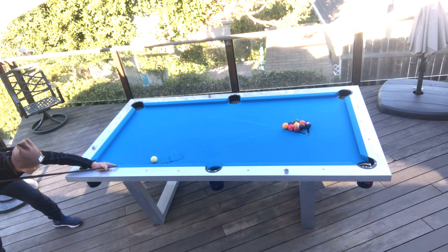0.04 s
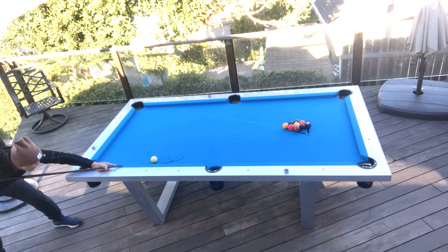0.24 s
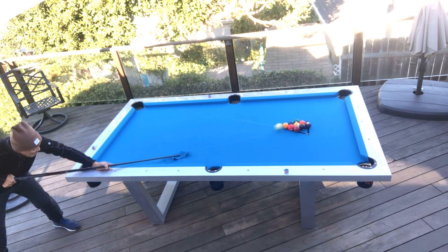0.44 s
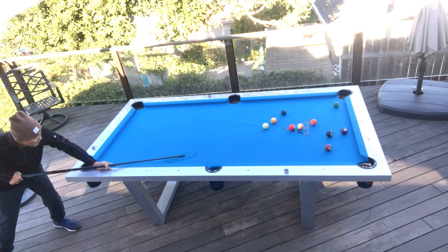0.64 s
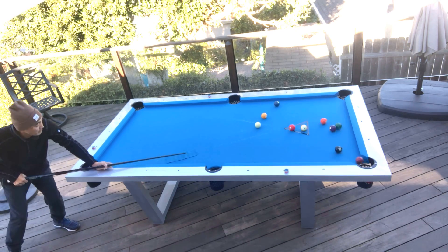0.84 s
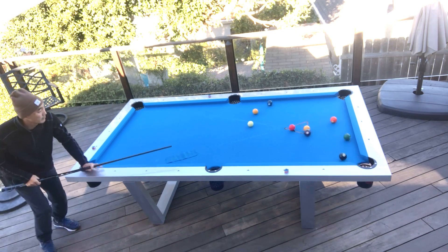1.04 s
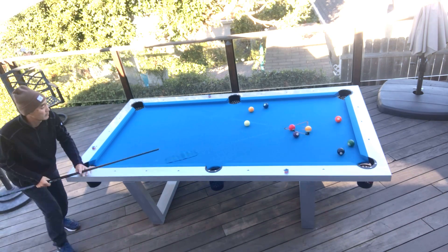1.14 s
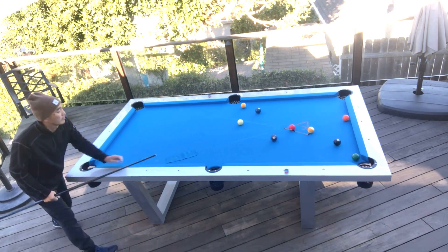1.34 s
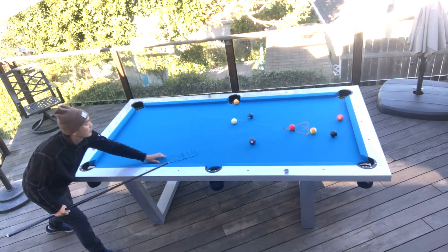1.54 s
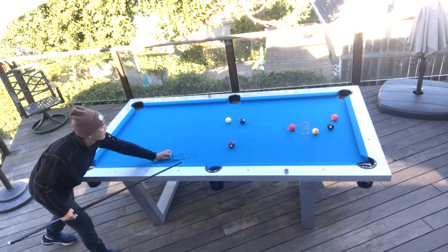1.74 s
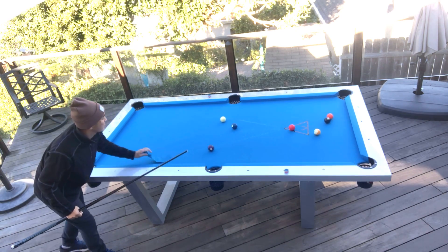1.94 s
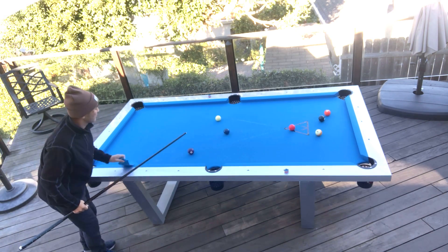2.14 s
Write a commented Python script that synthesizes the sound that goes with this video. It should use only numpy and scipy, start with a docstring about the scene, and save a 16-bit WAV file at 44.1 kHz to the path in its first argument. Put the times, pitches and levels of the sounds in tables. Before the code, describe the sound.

Pool balls burst apart with a loud crack, scattering, clacking and rolling across an outdoor table.

```python
"""A pool break outdoors

The cue cracks against the cue ball, which hops on the slate and bursts the rack. Hard impacts between
balls radiate short pulses; softer ones on cushions and pockets excite the damped modes of the table.
Deck and house walls reflect each impact, over rolling balls, the player's movements and a faint rumble."""
import sys
import numpy as np
from scipy import signal
from scipy.fft import rfft, irfft
from scipy.io import wavfile
from scipy.ndimage import map_coordinates

SR = 44100
rng = np.random.default_rng(int(sys.argv[2]) if len(sys.argv) > 2 else 0)


def log_audio(samples):
    """Write samples as a 16-bit WAV file to the path given in sys.argv[1]."""
    # one column per channel
    frames = np.atleast_2d(samples).T
    # limit to full scale, then quantise
    limited = np.clip(frames, -1, 1)
    pcm = np.round(limited * 32767).astype(np.int16)
    wavfile.write(sys.argv[1], SR, pcm)


N = 97020
T = np.arange(N) / SR
HZ = np.fft.rfftfreq(2 * N, 1 / SR)

# spectrum of a collision between two balls: f/Hz, level/dB
COLLISION_SPECTRUM = [(60, -31.5), (250, -18.5), (650, -23.5), (900, -7), (1150, 1), (1700, 3.5), (2400, 0),
                      (3200, -5), (3900, -18), (5500, -33), (7500, -49.5), (15000, -65.5)]


def amp(db):
    """Amplitude ratio of a level in decibels."""
    return 10 ** (np.asarray(db) / 20)


def unit(x):
    """Normalisation to unit energy."""
    return x / np.sqrt(np.sum(x ** 2) + 1e-20)


def along(points, hz):
    """Interpolation of (f/Hz, value) points on a logarithmic frequency axis."""
    f, values = np.transpose(points)
    return np.interp(np.log(hz + 1), np.log(f + 1), values)


def envelope(points):
    """Amplitude envelope through (t/s, level/dB) points."""
    return amp(np.interp(T, *np.transpose(points)))


def mix(*parts):
    """Superposition of sounds of different lengths."""
    size = max(map(len, parts))
    return sum(np.pad(p, (0, size - len(p))) for p in parts)


def noise(spectrum):
    """Stationary noise: white noise filtered to a spectrum, at unit rms."""
    x = irfft(rfft(rng.standard_normal(2 * N)) * amp(along(spectrum, HZ)))[:N]
    return x / x.std()


def pulse(spectrum, tilt=0, size=4096):
    """Minimum-phase pulse by cepstral folding; the spectrum tilts above 500 Hz by tilt dB/octave."""
    hz = np.fft.rfftfreq(size, 1 / SR)
    db = along(spectrum, hz) + tilt * np.log2(np.maximum(hz, 500))
    cepstrum = irfft(np.log(amp(db)))
    cepstrum[1:size // 2] *= 2
    cepstrum[size // 2:] = 0
    return unit(irfft(np.exp(rfft(cepstrum))))


def burst(spectrum, t60, rise=0.0004, hold=0, tilt=0, size=16384):
    """Modal overlap: densely packed resonances act as noise that rises, holds and decays (times in s)."""
    t = T[:size]
    shape = (1 - np.exp(-t / rise)) * amp(-60 * np.maximum(t - hold, 0) / t60)
    excitation = rng.choice([-1, 1], size) * shape
    return unit(signal.fftconvolve(excitation, pulse(spectrum, tilt))[:size])


def ring(modes, rise, spread_db=1.5, spread_rad=0.4):
    """Free vibration: damped modes of alternating sign, varying in level and phase at each blow."""
    t = T[:SR]
    x = np.zeros(SR)
    for k, (hz, db, t60) in enumerate(modes):
        decay = amp(db + spread_db * rng.normal() - 60 * t / t60)
        x += (-1) ** k * decay * np.sin(2 * np.pi * hz * t + spread_rad * rng.normal())
    return unit(x * (1 - np.exp(-t / rise)))


def reverberation(far_db=-13.5, delay_s=0.0048, rise_s=0.0065):
    """Diffuse reflection from near and far surfaces: each band decays exponentially at its own rate."""
    # decay times of deck and railing: f/Hz, T60/s
    deck = [(100, .45), (300, 0.25), (1000, 0.19), (2500, 0.18), (6000, 0.17), (14000, 0.13)]
    # decay times of the house walls: f/Hz, T60/s
    walls = [(100, 0.81), (300, 0.89), (1000, 1.1), (2500, 0.63), (6000, 0.52), (14000, 0.22)]
    hz, t, bands = signal.stft(rng.standard_normal(SR), SR, nperseg=256)

    def decay(t60s):
        gain = np.sqrt(2 * np.log(1000) / (SR * along(t60s, 870)))  # unit energy at 870 Hz
        return gain * np.exp(-np.log(1000) * t / along(t60s, hz)[:, None])

    bands = bands * (decay(deck) + amp(far_db) * decay(walls))
    echoes = signal.istft(bands, SR, nperseg=256)[1][:SR]
    onset = 1 - np.exp(-np.maximum(T[:SR] - delay_s, 0) / rise_s)
    return echoes * onset


def add(out, s, x, room_db):
    """Convolution with a direct path and fresh reverberation; the sound enters out at s seconds."""
    path = amp(room_db) * reverberation()
    path[0] += 1
    heard = signal.fftconvolve(x, path)
    start = round(s * SR)
    out[start:start + len(heard)] += heard[:N - start]


def air():
    """Ambient noise: a low, steady outdoor rumble."""
    # outdoor background: f/Hz, level/dB
    spectrum = [(25, -31.5), (45, -4.5), (70, -1.5), (100, 3), (190, -5), (256, -0.5), (330, -9),
                (530, -19.5), (1040, -25), (2000, -38.5), (4000, -41.5), (7000, -45), (10000, -55.5),
                (16000, -64.5)]
    return amp(-50.5) * noise(spectrum)


def player(flutter_db=2, flutter_hz=30):
    """Friction makes sleeves rustle; footfalls drive the deck boards into low vibration."""
    # course of the rustle: t/s, level/dB
    movement = [(.1, -96), (.14, -74.5), (.5, -68), (.8, -69.5), (1.05, -63), (1.15, -88), (1.35, -70),
                (1.55, -60.5), (1.75, -82), (1.85, -73), (2.06, -80), (2.2, -79.5)]
    # rubbing fabric: f/Hz, level/dB
    fabric = [(300, -7), (1500, 8), (4500, -1), (7000, -4), (9500, -13.5), (14000, -10), (16000, -17.5)]
    # footfalls: t/s, level/dB
    steps = [(0.956, -18), (1.591, -22)]
    # response of the boards: f/Hz, level/dB
    boards = [(30, -17), (60, 7), (90, -3), (140, -14.5), (250, 2), (500, -36), (2000, -49.5), (10000, -72)]
    flutter = map_coordinates(rng.standard_normal(128), [T * flutter_hz], mode="wrap")
    out = noise(fabric) * envelope(movement) * amp(flutter_db * flutter)
    for s, db in steps:
        add(out, s, amp(db) * burst(boards, t60=0.32, rise=0.017), room_db=-14)
    return out


def ticks():
    """Heavily damped transients: light ticks and scuffs around the table."""
    # light contacts: t/s, level/dB, T60/s, tilt/(dB/octave)
    contacts = [(.126, -25.5, 0.071, 0.5), (0.806, -31, .04, -0.5), (.939, -21, .03, 2),
                (1.046, -17.5, 0.021, -2.5), (1.167, -17.5, 0.05, -5), (1.253, -35, .08, 3),
                (1.333, -35.5, 0.025, 2), (1.54, -18.5, 0.056, -3), (1.637, -23, 0.076, -0.5),
                (1.677, -23, 0.047, 1.5), (1.694, -11, 0.041, -5), (1.903, -17.5, 0.06, -4),
                (2.015, -27, 0.087, 2), (2.033, -18.5, 0.08, -0.5), (2.11, -26.5, 0.054, -4)]
    # one tick: f/Hz, level/dB
    spectrum = [(60, -25), (200, -5.5), (1500, 9.5), (3000, -1), (4800, 0), (7000, -8.5), (10000, -19),
                (15000, -24), (16000, -25.5)]
    out = np.zeros(N)
    for s, db, t60, tilt in contacts:
        add(out, s, amp(db) * burst(spectrum, t60, rise=0.0015, tilt=tilt), room_db=-4.5)
    return out


def cue(slide_s=0.14, strike_s=0.2338):
    """Sliding friction, then impact: the tip cracks, the ferrule pings and the wooden shaft resonates."""
    # shaft rubbing over the bridge hand: f/Hz, level/dB
    slide = [(500, 2), (2000, 0.5), (5000, -5.5), (7000, -4), (9000, -18), (12000, -12), (14500, -2.5),
             (16000, -9)]
    # tip striking the cue ball: f/Hz, level/dB
    tip = [(60, -36), (300, -5), (900, 4), (2500, -8.5), (4000, -2), (5800, -5), (6900, -1.5), (8000, -7),
           (10500, -16), (12000, -13.5), (13500, -19.5), (15000, -18), (16000, -21.5)]
    # modes of the ferrule: f/Hz, level/dB, T60/s
    ferrule = [(3940, -9, 0.038), (4840, -10, .03), (6760, 0.5, .022), (6930, -5, .02)]
    # response of the shaft: f/Hz, level/dB
    shaft = [(40, -45.5), (100, -14), (170, 3.5), (300, -3), (460, 2), (570, -6), (820, 3.5), (1150, 0),
             (1500, -7), (2100, -8), (3500, -19.5), (9000, -35)]
    out = np.zeros(N)
    add(out, slide_s, amp(-30) * burst(slide, t60=0.05, rise=0.04, hold=strike_s - slide_s), room_db=-2)
    add(out, strike_s, amp(0.5) * burst(tip, t60=0.033, hold=0.0018), room_db=-4.5)
    add(out, strike_s, amp(-3) * ring(ferrule, rise=0.001), room_db=-8.5)
    add(out, strike_s, amp(6.5) * burst(shaft, t60=0.15, rise=0.003, hold=0.0076), room_db=-2)
    return out


def knocks(rise_s=0.0015):
    """Impact excitation: a ball bangs on slate or cushion and the table rings in its normal modes."""
    # impacts: t/s, level/dB, tilt/(dB/octave), relative ring level/dB
    impacts = [(.3533, 7.5, -3, -9.5), (.519, -1.5, -12, -8.5), (.554, -7, -6, 4), (.588, 12.5, 2, -3.5),
               (.7143, 6.5, 0, -1), (.791, -3.5, -0.5, 3.5), (.834, -7, -8.5, 2), (1.545, -15, -15, -10)]
    # one bang: f/Hz, level/dB
    spectrum = [(50, -39.5), (110, -13.5), (180, -9), (280, -4.5), (370, -19.5), (470, -10.5), (800, -9.5),
                (1150, 4), (1600, -8.5), (2100, -7), (3300, -18.5), (4600, -37.5), (8000, -50.5),
                (15000, -67)]
    # modes of the table: f/Hz, level/dB, T60/s
    table_modes = [(180.4, -13.5, 0.11), (256, -15, 0.27), (447, -9, 0.1), (661.5, -0.5, 0.077),
                   (854, -17.5, 0.071), (966, -20.5, 0.48), (1055, -11.5, .25), (1110, 1, 0.11),
                   (1180, -7.5, 0.068), (1239, -4, 0.083), (1565, -9.5, .07), (1990, -41.5, .17),
                   (1986, -21.5, .12), (2173, -18, 0.2)]
    out = np.zeros(N)
    for s, db, tilt, ring_db in impacts:
        bang = burst(spectrum, t60=0.057, rise=rise_s, hold=0.01, tilt=tilt)
        ringing = amp(ring_db) * ring(table_modes, rise_s)
        add(out, s, amp(db) * mix(bang, ringing), room_db=-1.5)
    return out


def click(tilt, linger_hz=2130, width_hz=1380):
    """The pulse of one collision; the group delay of an all-pass filter lets one pitch linger."""
    _, poles = signal.iirpeak(linger_hz, linger_hz / width_hz, SR)
    return signal.lfilter(poles[::-1], poles, pulse(COLLISION_SPECTRUM, tilt))


def clacks(rail_delay_s=0.0032):
    """Elastic collision: two balls radiate a pulse, which the table scatters, and jolt the bed."""
    # collisions: t/s, level/dB, tilt/(dB/octave), relative snap level/dB, relative echo level/dB
    collisions = [(0.3885, 10, 8.5, -5.5, -21), (0.402, 5, 7, -29, -1), (0.4048, 6, 8, -38, 3),
                  (0.4141, 7.5, -1, -40, 0.5), (.428, -2, 5.5, -39, 3), (0.4335, -5, -1, -24, -5),
                  (0.518, -6.5, -2, -21, -22), (0.625, -3.5, 3.5, -18, -4.5),
                  (0.7893, -0.5, -4.5, -20, -4.5), (0.9198, -3.5, -3, -20, -2), (0.9775, -10, -2, -22, 2.5),
                  (1.1648, -21, -10, -19.5, 2), (1.4597, -1.5, -1.5, -18.5, -1),
                  (1.6563, -17.5, -5.5, -13, 6), (1.8668, -7.5, -3, -24.5, -6.5)]
    # response of the table's bed: f/Hz, level/dB
    bed = [(50, -34), (150, -4), (330, -3), (500, -6.5), (750, -1), (1200, -8), (2000, -23.5), (4000, -35),
           (12000, -59.5)]
    # hard snap of contact: f/Hz, level/dB
    snap_spectrum = [(1000, 4.5), (3000, 13), (4800, 5), (6600, -17), (8300, -8), (12000, -7),
                     (14800, -5.5), (16000, -8)]
    out = np.zeros(N)
    for s, db, tilt, snap_db, room_db in collisions:
        direct = click(tilt)
        rail_echo = amp(-11) * np.pad(direct, (round(rail_delay_s * SR), 0))
        scatter = amp(3.5) * burst(COLLISION_SPECTRUM, t60=0.03, rise=0.00044, tilt=tilt)
        body = unit(mix(direct, rail_echo, scatter))
        jolt = amp(-10) * burst(bed, t60=0.16, rise=0.021)
        snap = amp(snap_db) * burst(snap_spectrum, t60=0.011)
        add(out, s, amp(db) * mix(body, jolt, snap), room_db)
    return out


def rack(start_s=0.403, length_s=0.097, count=32, fade_db=21.5, spread_db=4.6):
    """A collision cascade, growing sparser and weaker as the rack opens; the rails ring on."""
    # modes of the rails: f/Hz, level/dB, T60/s
    rail_modes = [(1890, -10.5, 0.24), (2040, -2.5, .35), (2150, 2, 0.29), (2525, 4.5, 0.25),
                  (2480, -1.5, 0.24), (2733, 4, 0.26), (2720, -8.5, 0.28), (2980, -10, 0.36)]
    out, hits = np.zeros(N), np.zeros(SR // 2)
    for k, (jitter, weakness) in enumerate(rng.random((count, 2))):
        progress = ((k + jitter) / count) ** 1.3
        strength = amp(-5.5 - fade_db * progress - spread_db * weakness)
        hits[int(progress * length_s * SR)] += rng.choice([-1, 1]) * strength
    add(out, start_s, signal.fftconvolve(hits, click(tilt=8)), room_db=-7)
    add(out, start_s, amp(3) * ring(rail_modes, rise=0.018), room_db=-22.5)
    return out


def rolling():
    """Rolling noise: the scattered balls rumble over the cloth-covered slate, fading as they slow."""
    # course of the rumble: t/s, level/dB
    motion = [(.4, -88), (.5, -46), (.95, -46.5), (1.25, -58), (1.6, -50), (1.9, -58), (2.2, -69)]
    # balls on cloth: f/Hz, level/dB
    spectrum = [(40, -22), (70, -4.5), (150, -1), (280, -3), (400, -0.5), (550, -20), (730, -2.5),
                (1000, -20.5), (2000, -25.5), (4000, -43.5), (15000, -53.5)]
    return noise(spectrum) * envelope(motion)


def jaw(contact_s=1.361):
    """A soft impact carries little treble: a ball nudges the jaw of a pocket."""
    # response of the jaw: f/Hz, level/dB
    spectrum = [(50, -51), (200, -5), (500, -14.5), (680, -9.5), (800, -14), (930, -1), (1200, -8),
                (1450, -32.5), (3000, -41), (10000, -67)]
    out = np.zeros(N)
    add(out, contact_s, amp(-5.5) * burst(spectrum, t60=0.065, hold=0.019), room_db=-1.5)
    return out


def pockets():
    """A falling ball excites the low modes of a pocket and rattles its liner."""
    # landings: t/s, level/dB, relative rattle level/dB
    drops = [(1.701, 5.5, -15), (1.771, -15.5, -5.5), (1.908, 0, -18), (2.038, -7.5, -14),
             (2.126, -15.5, -12.5)]
    # modes of the pocket: f/Hz, level/dB, T60/s
    pocket_modes = [(72.2, -12, 0.37), (88.2, -10.5, 0.36), (145.4, -11, 0.46), (182.4, -0.5, .19),
                    (268, -8, 0.12), (334, -15, 0.15), (452.6, -13, 0.095), (763, -15.5, 0.13)]
    # rattle of the liner: f/Hz, level/dB
    liner = [(100, 5.5), (400, -20), (800, 4.5), (2000, -8), (4000, -14), (8000, -32.5), (15000, -37)]
    out = np.zeros(N)
    for s, db, rattle_db in drops:
        thud = ring(pocket_modes, rise=0.0025)
        rattle = amp(rattle_db) * burst(liner, t60=0.19)
        add(out, s, amp(db) * mix(thud, rattle), room_db=-8.5)
    return out


def scene():
    """Superposition of all sources at one microphone."""
    impacts = cue() + ticks() + clacks() + rack() + knocks() + jaw() + pockets()
    return (impacts + rolling() + player() + air())[None]


def record(dry, low_cut_hz=58, ceiling=0.75, top_hz=15650):
    """Band limiting and saturation: the microphone drops deep bass, rounds peaks and cuts the top."""
    high_pass = signal.butter(3, low_cut_hz, "high", fs=SR, output="sos")
    thin = signal.sosfilt(high_pass, dry)
    rounded = thin / (1 + np.abs(thin / ceiling) ** 4) ** (1 / 4)
    low_pass = 1 / (1 + (HZ / top_hz) ** 120)
    return irfft(rfft(rounded, 2 * N) * low_pass)[:, :N]


dry = scene()
out = record(dry)
log_audio(out)
```